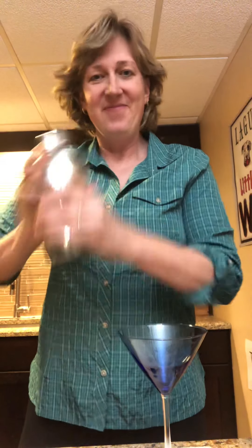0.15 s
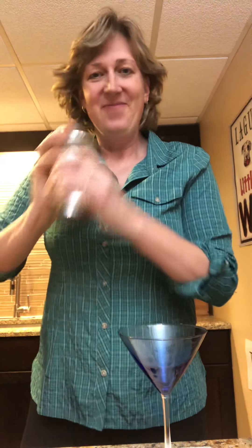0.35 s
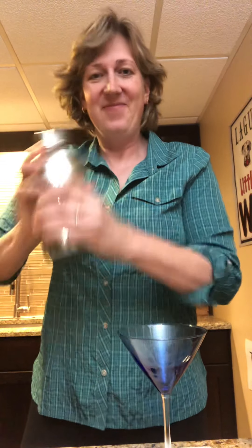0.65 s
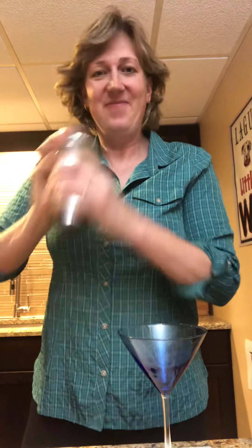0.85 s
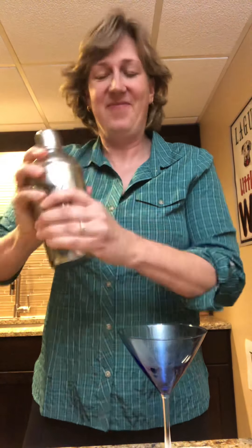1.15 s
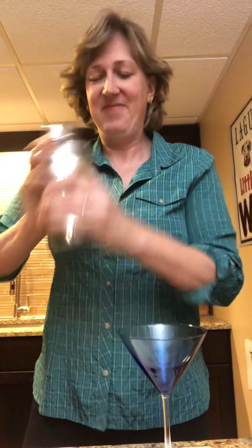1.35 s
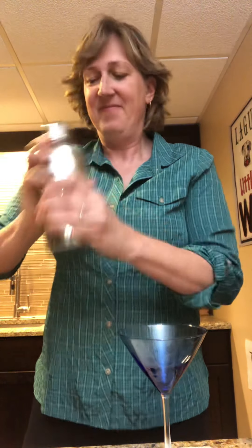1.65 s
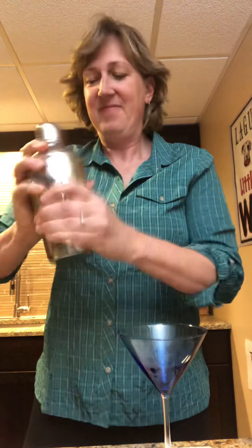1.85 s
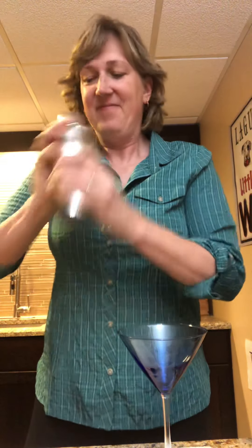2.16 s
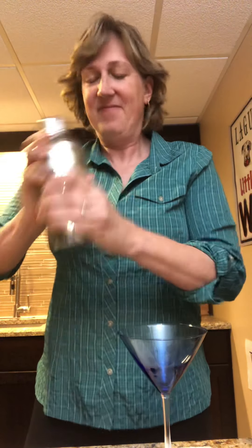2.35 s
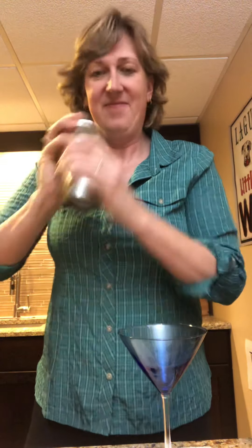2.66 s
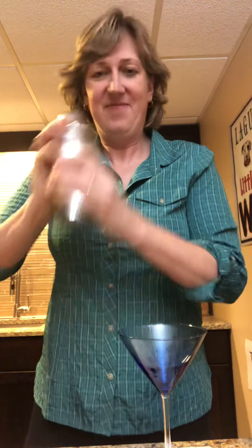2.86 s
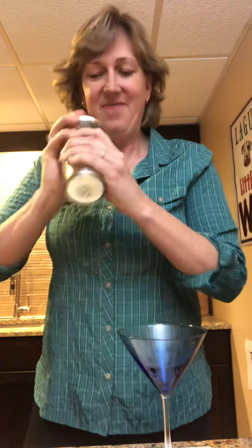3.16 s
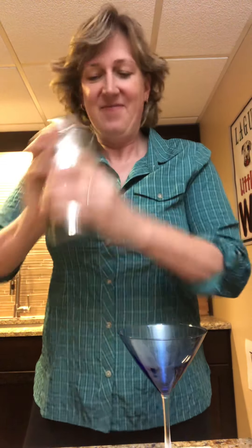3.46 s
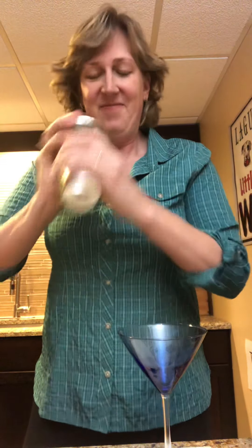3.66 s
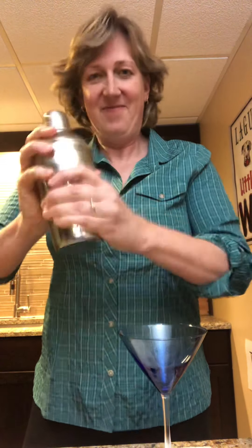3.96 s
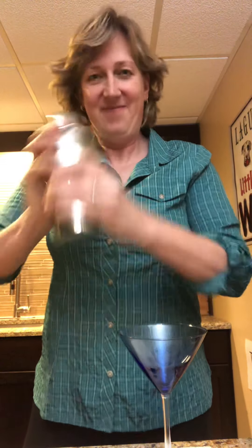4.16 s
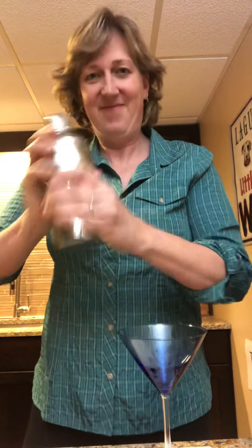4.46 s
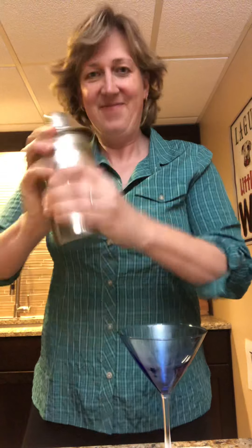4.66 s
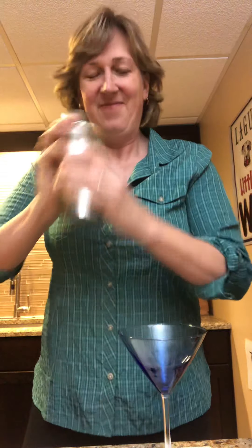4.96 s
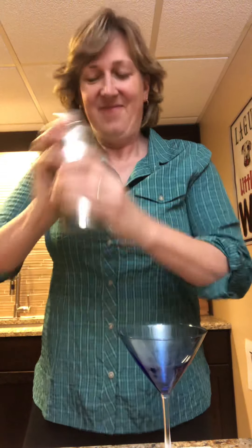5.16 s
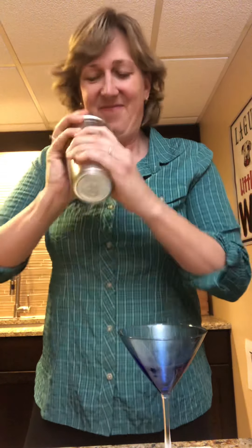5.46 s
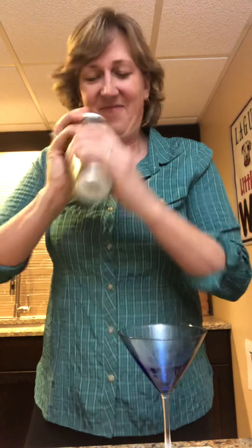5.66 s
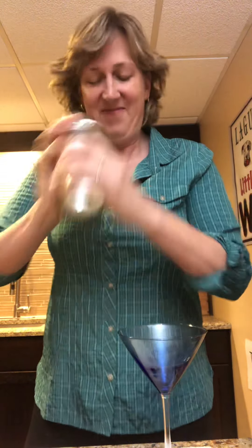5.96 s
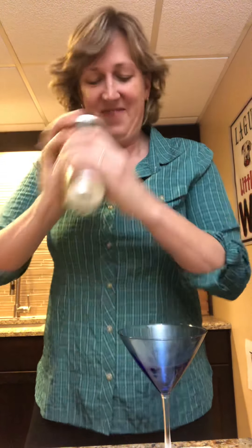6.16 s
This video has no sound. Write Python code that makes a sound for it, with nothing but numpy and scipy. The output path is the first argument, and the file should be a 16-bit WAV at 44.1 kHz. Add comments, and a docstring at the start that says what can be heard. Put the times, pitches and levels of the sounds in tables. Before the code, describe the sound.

A hand-held metal shaker rattles already from the start and continues without a break for six seconds. Ice cubes knock the damped steel in uneven bursts, some dull and hollow, others sharp and glassy, while liquid sloshes and occasionally gulps. One faint dull bump occurs near five seconds. Single close microphone, small indoor room, quiet low hum beneath; shaking dies down at the end.

```python
"""Ice cubes and a drink are shaken by hand in a steel cocktail shaker, about four strokes/s, in a small room.
Throughout: mains hum and soft air (sines, band noise); small ice and liquid churn (noise grains in resonators).
From the first stroke: cubes strike the steel (noise bursts ring wall, clink, crack, cavity), liquid follows the ice,
air pockets gulp (rising damped sines); between landings stray cubes tumble and the drink sloshes softly.
Near 5 s: one dull bump (damped sine). The last landing is faint."""
import sys
import numpy as np
from scipy import signal
from scipy.io import wavfile
from scipy.ndimage import uniform_filter1d

SR = 44100
rng = np.random.default_rng(int(sys.argv[2]) if len(sys.argv) > 2 else 0)


def transcribe(signal):
    """Save signal, clipped to [-1, 1], as a 16-bit WAV file at the path in sys.argv[1]."""
    frames = np.atleast_2d(signal).T
    limited = np.clip(frames, -1, 1)
    pcm = np.round(limited * 32767).astype(np.int16)
    wavfile.write(sys.argv[1], SR, pcm)


N = 278182
TIME = np.arange(N) / SR

# mains hum: f/Hz, RMS level/dB
HUM = [(59.3, -60.5), (178, -70.5)]
# landings of the load: t/s, ice level/dB, liquid level/dB, loose ice before the landing level/dB
STROKES = [(0.015, -33.5, -40, -51), (0.257, -34, -38.5, -35.5), (0.5, -28.5, -36, -36),
           (0.746, -33.5, -41, -42), (0.977, -30.5, -42.5, -37.5), (1.205, -28.5, -37.5, -39),
           (1.472, -25.5, -37, -40.5), (1.695, -28, -40.5, -37), (1.914, -31, -40.5, -40.5),
           (2.155, -33, -40.5, -41.5), (2.41, -30, -39, -34.5), (2.628, -31, -37, -30),
           (2.855, -35, -40.5, -41), (3.08, -27.5, -39.5, -38), (3.3, -31.5, -40.5, -39.5),
           (3.55, -32, -40, -40.5), (3.806, -30, -39.5, -39), (4.02, -32, -39.5, -37.5),
           (4.275, -26, -36.5, -39.5), (4.469, -36, -41.5, -41), (4.728, -32, -42, -40.5),
           (4.958, -29.5, -39, -37.5), (5.205, -27, -46, -41), (5.419, -29, -43, -46),
           (5.628, -32, -37.5, -42.5), (5.843, -27.5, -39.5, -41.5), (6.068, -28, -40, -40.5),
           (6.281, -57, -56, -36.5)]
# knocks on the shaker, mostly single cubes on the steel: t/s, cavity level/dB, wall level/dB, clink level/dB,
# crack level/dB
BLOWS = [(0.0044, -32, -25, -46, -45), (0.0205, -33, -21.5, -42, -56), (0.0704, -49, -20.5, -30.5, -64),
         (0.2376, -32.5, -28, -27, -45), (0.241, -36, -26.5, -28, -47), (0.248, -48, -22.5, -20.5, -40),
         (0.2684, -32.5, -19, -26, -48), (0.3137, -37, -15, -22, -49), (0.4732, -40.5, -26, -27.5, -46),
         (0.5195, -40, -19.5, -28, -43), (0.601, -42.5, -34, -36, -64), (0.7204, -54, -34, -27, -49),
         (0.7418, -38, -24, -29, -46), (0.7491, -40, -27, -28, -39), (0.8039, -34, -21.5, -40, -52),
         (0.9723, -35, -22, -31, -51), (0.9981, -46, -24.5, -37, -57), (1.1668, -60, -44, -23.5, -47),
         (1.2012, -40, -34, -27, -47), (1.4645, -47, -28, -20.5, -45), (1.6466, -36, -28, -20.5, -40),
         (1.7059, -47, -25, -27.5, -43), (1.9683, -53, -22.5, -40, -65), (2.163, -47, -24, -36, -41.5),
         (2.3529, -49, -40, -21.5, -45), (2.3775, -32.5, -16.5, -39, -45), (2.4036, -45.5, -33, -22, -39),
         (2.4275, -50, -21.5, -29.5, -46), (2.4416, -38.5, -29, -30, -46), (2.6221, -38, -19, -48, -43),
         (2.652, -47, -18.5, -31.5, -47), (2.8418, -35.5, -23, -22.5, -44), (2.9233, -48, -25, -32.5, -50),
         (2.931, -50, -26, -27, -43), (3.0492, -44, -12.5, -29, -53), (3.293, -42, -32, -29, -38),
         (3.353, -40, -24, -30.5, -49), (3.5515, -38, -29, -26, -41), (3.8015, -28.5, -13.5, -22.5, -46),
         (3.8592, -42, -24, -27, -59), (3.9957, -54, -32.5, -31, -41), (4.0108, -42, -35, -26.5, -47),
         (4.126, -45, -28, -33, -42), (4.1978, -61, -31, -36, -49), (4.2485, -66, -20.5, -21.5, -41),
         (4.282, -39, -18, -33, -42), (4.443, -56, -14.5, -19, -52), (4.4476, -45, -15.5, -20, -30),
         (4.5362, -37, -31, -30.5, -47), (4.716, -36.5, -30, -23, -40.5), (4.8032, -42, -26, -37, -65),
         (4.912, -59, -34, -27, -46), (4.9505, -41, -26.5, -28.5, -42), (5.1824, -56, -28.5, -31, -39),
         (5.1952, -29, -23, -45, -51), (5.2075, -34.5, -22, -48, -46), (5.4058, -34, -17.5, -21.5, -37),
         (5.427, -42, -20.5, -27.5, -47), (5.4351, -44, -21, -24, -39), (5.5732, -52, -47, -28.5, -45),
         (5.6116, -38, -21, -27, -48), (5.62, -37, -31, -27, -41.5), (5.6801, -36, -26.5, -31, -47),
         (5.8243, -41, -21, -21.5, -41), (5.8552, -35, -23, -41, -49), (5.921, -50, -27, -28, -44),
         (6.059, -44, -44, -30, -37.5), (6.2641, -54, -30.5, -22.5, -40)]
# resonances of the enclosed air: f/Hz, width/Hz, relative level/dB
CAVITY = [(318, 33.5, -9), (424, 123, -8), (568, 109, -4), (729, 220, 1)]
# lower resonances of the hand-damped steel: f/Hz, width/Hz, relative level/dB
WALL = [(1442, 402, -12), (1687, 200, -2), (1844, 138, -0.5), (2286, 230, -1.5), (2628, 180, -5)]
# upper resonances of the steel: f/Hz, width/Hz, relative level/dB
CLINK = [(2837, 250, -1.5), (3200, 380, 4.5), (3660, 580, 4.5), (4137, 195, 1.5), (4490, 785, -4),
         (5410, 660, -15.5)]
# bands of the cracking ice: f/Hz, width/Hz, relative level/dB
CRACK = [(6000, 4100, 2.5), (8600, 1400, 1), (11200, 3600, -7.5), (13600, 3000, -37)]
# drive of cavity, wall, clink, crack by a knock: resonances, swell/s, chatter/s
PARTS = [(CAVITY, 0.0045, 0.0028), (WALL, 0.00017, 0.0012), (CLINK, 0.0001, 0.0021),
         (CRACK, 0.00011, 0.0032)]
# air pockets gulping in the drink: t/s, initial f/Hz, level/dB (envelope scale is twice this gain)
GULPS = [(.012, 773, -39), (.752, 494, -39.5), (1.236, 547, -41.5), (3.688, 715, -40.5), (4.311, 687, -41),
         (5.207, 724, -33)]
# dull bump: t/s, f/Hz, level/dB, decay/s
BUMP = (5.015, 90, -51, .03)
# room decay: f/Hz, t60/s
ROOM_T60 = [(200, 0.46), (2000, 0.11), (12000, 0.2)]

PART_NAMES = ("cavity", "wall", "clink", "crack")
STROKE_HZ = 4.25
ICE_AHEAD_S, ICE_RISE_S, ICE_FALL_S = 0.006, 0.026, 0.029    # ice lands ahead of the liquid
LIQUID_RISE_S, LIQUID_FALL_S = 0.016, 0.041
RETURN_ICE_DB, RETURN_LIQUID_DB = -21, -11    # fall-back midway between landings, re the landing
LOOSE_LIQUID_DB = -50.5    # the liquid never quite rests
FLIGHT_S, FLIGHT_DB = 0.012, -4.5    # ice in free flight before a listed blow: thinner rattle
LEAD_S = 0.006    # graze ahead of a hit
CUTOFF_HZ = 15900


def from_db(db):
    """Decibels to gain."""
    return 10 ** (np.asarray(db) / 20)


def to_db(gain):
    """Gain to decibels."""
    return 20 * np.log10(gain)


def height(x):
    """Mean envelope height of an oscillation."""
    return np.sqrt(2 * np.mean(x ** 2) + 1e-20)


def band(x, low_hz, high_hz, order=2):
    """Causal band-pass."""
    edges_hz = [low_hz, min(high_hz, 0.45 * SR)]
    return signal.sosfilt(signal.butter(order, edges_hz, "band", fs=SR, output="sos"), x)


def resonate(x, modes, detune=1, uneven_db=0, tilt_db_per_octave=0):
    """Parallel resonances, each applied twice so that the valleys stay dark."""
    out = 0
    for k, (hz, width_hz, db) in enumerate(modes):
        r = np.exp(-np.pi * width_hz * np.pi / 2 / SR)    # pole radius; pi/2 offsets the narrowing by two passes
        b = [(1 - r * r) / 2, 0, (r * r - 1) / 2]
        a = [1, -2 * r * np.cos(2 * np.pi * hz * detune / SR), r * r]
        once = signal.lfilter(b, a, x[k] + 1e-18)
        rung = signal.lfilter(b, a, once)
        tilt_db = tilt_db_per_octave * np.log2(hz / modes[0][0])
        out = out + from_db(db + tilt_db + uneven_db * rng.standard_normal()) * rung
    return out


def background(air_db=-66):
    """Mains hum as steady sines over room air as low band noise."""
    air = band(rng.standard_normal(N), 98, 193, order=1)
    hum = 0
    for hz, db in HUM:
        hum = hum + np.sqrt(2) * from_db(db) * np.sin(2 * np.pi * (hz * TIME + rng.random()))
    return hum + from_db(air_db) * air / height(air)


def landings(t, column, ahead_s, rise_s, fall_s, return_db, loose_db):
    """Motion gain at times t: a swell per landing, a softer one per return, and a floor, summed as power."""
    s, db = np.transpose(STROKES)[[0, column]]
    swell_s = np.r_[s, (s[1:] + s[:-1]) / 2]
    swell_db = np.r_[db, db[:-1] + return_db]
    power = from_db(loose_db) ** 2
    for at, level_db in zip(swell_s, swell_db):
        late = t - at + ahead_s
        swell = from_db(level_db) / (1 + (late / np.where(late < 0, rise_s, fall_s)) ** 2)
        power = power + swell ** 2
    return np.sqrt(power)


def ice_motion(t):
    """Ice vigour as a gain at times t; loose pieces tumble harder on some strokes, less just before a blow."""
    s, loose_db = np.transpose(STROKES)[[0, 3]]
    floor_db = np.interp(t, s - 0.5 / STROKE_HZ, loose_db)
    vigour = landings(t, 1, ICE_AHEAD_S, ICE_RISE_S, ICE_FALL_S, RETURN_ICE_DB, floor_db)
    knocks = np.r_[np.sort(np.transpose(BLOWS)[0]), np.inf]
    wait = knocks[np.searchsorted(knocks, t)] - t
    return vigour * from_db(FLIGHT_DB * np.exp(-(wait / FLIGHT_S) ** 2))


def liquid_motion(t):
    """Liquid vigour as a gain at times t, peaking at each landing."""
    return landings(t, 2, 0, LIQUID_RISE_S, LIQUID_FALL_S, RETURN_LIQUID_DB, LOOSE_LIQUID_DB)


def clumps(depth_db=2.5, size=1500):
    """Small pieces move in bunches: gain wandering every few hundredths of a second."""
    knots = np.arange(0, N + size, size)
    wander = np.clip(rng.standard_normal(len(knots)), -2, 1)
    return from_db(depth_db * np.interp(np.arange(N), knots, wander))


def grains(per_s, spread_db, scrape_s):
    """Envelope of random touches of very uneven strength, each scraping on briefly."""
    hits = rng.random(N) < per_s / SR
    touches = hits * from_db(spread_db * np.minimum(rng.exponential(1, N), 3))
    return signal.lfilter([1], [1, -np.exp(-1 / (scrape_s * SR))], touches + 1e-18)


def rattle(touches, modes):
    """Touches scrape each mode with its own noise; level evened over 68 ms."""
    sound = resonate(touches * rng.standard_normal((len(modes), N)), modes)
    return sound / np.sqrt(2 * np.abs(uniform_filter1d(sound ** 2, size=3000)) + 1e-12)


def churn(wall_db=-5.5, clink_db=-4.5, crack_db=-23, sing_db=-7.5, slosh_db=-3, gurgle_db=-8, gulp_db=-17,
          usual_db=-38, patter_growth=0.86, crack_growth=1.1, sing_growth=0.24):
    """Small ice patters on the steel and keeps one mode singing; liquid slaps, gurgles and gulps."""
    vigour = clumps() * (ice_motion(TIME) / from_db(usual_db)) ** patter_growth
    liquid = clumps() * liquid_motion(TIME)
    chips = grains(per_s=320, spread_db=3.0, scrape_s=0.0023)
    nudges = grains(per_s=130, spread_db=6.5, scrape_s=0.0017)    # cushioned by liquid: no crack
    drops = grains(per_s=300, spread_db=4.5, scrape_s=0.0015)
    bubbles = grains(per_s=32, spread_db=7.5, scrape_s=0.00035)

    wall = from_db(wall_db) * rattle(chips + nudges, WALL)
    clink = from_db(clink_db) * rattle(chips, CLINK)
    patter = vigour * (wall + clink)
    # harder churning is brighter
    crunch = vigour ** crack_growth * from_db(crack_db) * rattle(chips, CRACK)
    # carries through the lulls
    singing = vigour ** sing_growth * from_db(sing_db) * rattle(nudges + chips, [(1772.0, 76, 0)])

    slosh = from_db(slosh_db) * rattle(drops, CAVITY)
    low_gulp = from_db(gulp_db) * rattle(drops, [(138, 152, 0)])
    gurgle = from_db(gurgle_db) * rattle(bubbles, [(746, 67, 0)])
    ice = from_db(usual_db) * (patter + crunch + singing)
    return ice + liquid * (slosh + low_gulp + gurgle)


def contact(t, swell_s, chatter_s, graze_db, graze_s=0.002):
    """Envelope of one touch: a graze, then a hit in a run of tiny slips that swells and dies."""
    after = np.maximum(t, 0)
    graze = from_db(graze_db) * np.exp(-np.abs(t) / graze_s)
    return graze + (1 - np.exp(-after / swell_s)) * np.exp(-after / chatter_s)


def blows(knocks, size=1600, wall_wander=0.024, cavity_wander=0.038, uneven_db=1.5,
          hardness_tilt=0.55, graze_db=-22, wall_graze_db=-28):
    """Each knock excites all four parts; the moving liquid shifts their pitch, the cavity's most."""
    lead = round(LEAD_S * SR)
    t = (np.arange(size) - lead) / SR
    out = np.zeros(N + size)
    for s, *levels in knocks:
        at = np.clip(round(s * SR), 0, N)
        # a sharp corner favours the upper steel modes, a cushioned flat face the lower
        hardness_db = np.clip(levels[2] - levels[1] - 0.5, -14, 14)
        for name, (modes, swell_s, chatter_s), db in zip(PART_NAMES, PARTS, levels):
            wander = cavity_wander if name == "cavity" else wall_wander
            detune = 1 + wander * np.clip(rng.standard_normal(), -2, 2)
            # a graze is too light to move the low wall modes much
            force = contact(t, swell_s, chatter_s, wall_graze_db if name == "wall" else graze_db)
            slips = force * rng.standard_normal((len(modes), size))
            tilt = hardness_tilt * hardness_db if name in ("wall", "clink") else 0
            sound = resonate(slips, modes, detune, uneven_db, tilt)
            body = round(SR * (0.011 if name == "cavity" else 0.005))    # span that sets the level
            out[at:at + size] += from_db(db) * sound / height(sound[lead:lead + body])
    return out[lead:lead + N]


def gulps(swell_s=0.0013, decay_s=0.013, chirp_per_s=0.76):
    """An air pocket rings briefly, rising a little in pitch as it closes."""
    out = 0
    for s, hz, db in GULPS:
        t = np.maximum(TIME - s, 0)
        envelope = (1 - np.exp(-t / swell_s)) * np.exp(-t / decay_s)
        tone = np.sin(2 * np.pi * hz * t * (1 + chirp_per_s * t))
        out = out + 2 * from_db(db) * envelope * tone
    return out


def cubes(s, above_db, spread_db=3.0, colour_db=3.5, clink_db=-3.0, crack_db=-21, thump_db=-4, uneven_db=2.5):
    """Knocks at times s, as strong as the load moves, with random weight and colour; columns as in BLOWS."""
    weight, colour, brittle, hollow = np.clip(rng.standard_normal((len(s), 4)), -1.6, 1.6).T
    steel_db = to_db(ice_motion(s)) + above_db + spread_db * weight
    tilt_db = colour_db * colour
    cavity = to_db(liquid_motion(s)) + thump_db + uneven_db * hollow
    wall = steel_db - tilt_db
    clink = steel_db + clink_db + tilt_db
    crack = steel_db + crack_db + 0.5 * tilt_db + uneven_db * brittle
    return np.c_[s, cavity, wall, clink, crack]


def landing_cubes(count=3, cluster_s=0.06, above_db=1.0):
    """A few cubes land one after another at the end of every stroke."""
    turn = (np.arange(count) + rng.random((len(STROKES), count))) / count - 0.5
    landing_s = np.transpose(STROKES)[0][:, None] - ICE_AHEAD_S
    return cubes((landing_s + cluster_s * turn).ravel(), above_db)


def tumbling_cubes(count=3, clear_s=0.04, above_db=3.0):
    """Stray cubes hit the wall between two landings, clear of both."""
    s = np.transpose(STROKES)[0][:, None]
    turn = (np.arange(count) + rng.random((len(s) - 1, count))) / count
    free_s = np.diff(s, axis=0) - 2 * clear_s
    return cubes((s[:-1] + clear_s + turn * free_s).ravel(), above_db)


def bump():
    """A dull, quickly damped low sine."""
    s, hz, db, decay_s = BUMP
    t = np.maximum(TIME - s, 0)
    return from_db(db) * np.sin(2 * np.pi * hz * t) * np.exp(-t / decay_s)


def reflections(first_echo_s=0.0033, size=20000):
    """Diffuse echoes as octave noise bands decaying by ROOM_T60; unit energy."""
    t, tail = np.arange(size) / SR, 0
    hz, t60 = np.transpose(ROOM_T60)
    for low_hz in 125 * 2 ** np.arange(7):
        band_t60 = np.interp(np.log(low_hz * np.sqrt(2)), np.log(hz), t60)
        tail = tail + band(rng.standard_normal(size), low_hz, 2 * low_hz) * from_db(-60 * t / band_t60)
    tail = tail * (t > first_echo_s)
    return tail / np.linalg.norm(tail)


def room(x, wet_db=-12.0):
    """The shaker swings to and fro, crossfading two reflection patterns."""
    swing = np.pi * STROKE_HZ * TIME
    wet = 0
    for place in (np.cos(swing), np.sin(swing)):
        wet = wet + signal.fftconvolve(x * place, reflections())[:N]
    return x + from_db(wet_db) * wet


def scene():
    """The shaker in the room, heard by one microphone."""
    knocks = np.vstack([BLOWS, landing_cubes(), tumbling_cubes()])
    shaker = churn() + blows(knocks) + gulps()
    return (background() + room(shaker) + bump())[None]


def record(dry, ceiling=0.53):
    """Rounds the highest peaks and cuts the top steeply."""
    rounded = dry / (1 + (dry / ceiling) ** 4) ** 0.25
    return signal.sosfilt(signal.ellip(10, 0.1, 80, CUTOFF_HZ, fs=SR, output="sos"), rounded)


dry = scene()
out = record(dry)
transcribe(out)
```